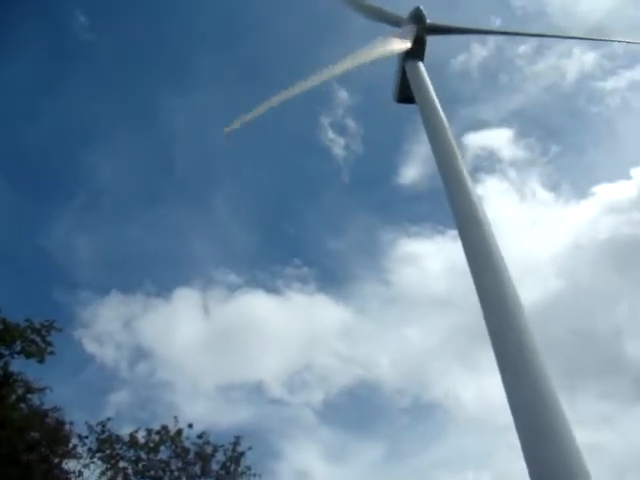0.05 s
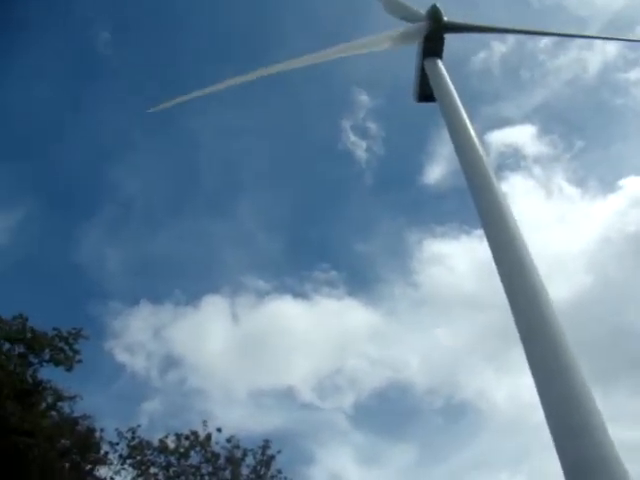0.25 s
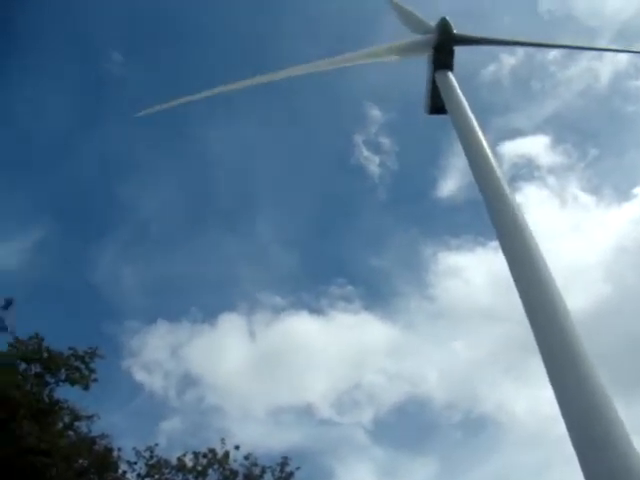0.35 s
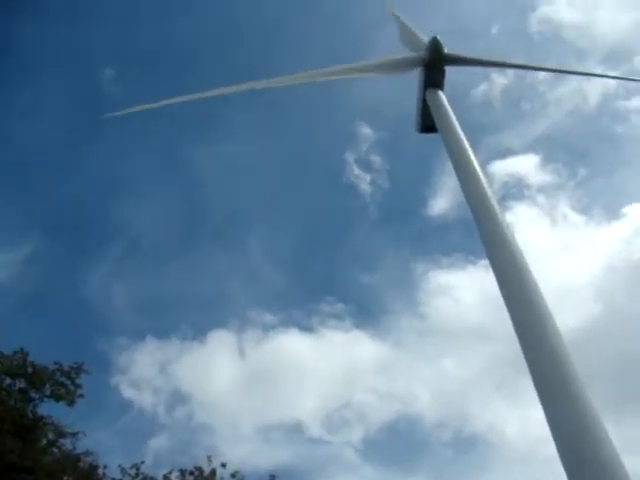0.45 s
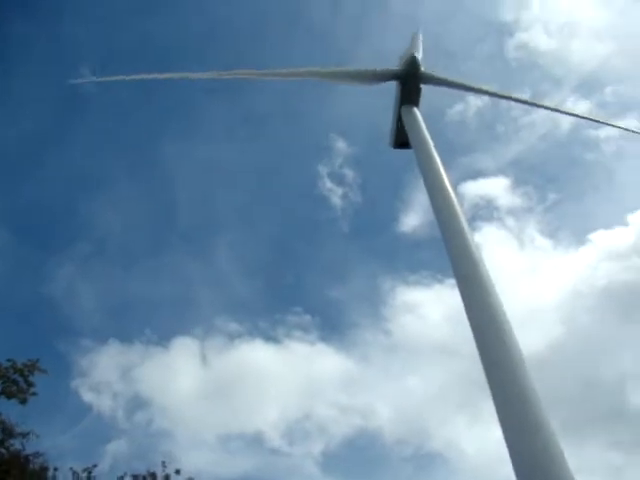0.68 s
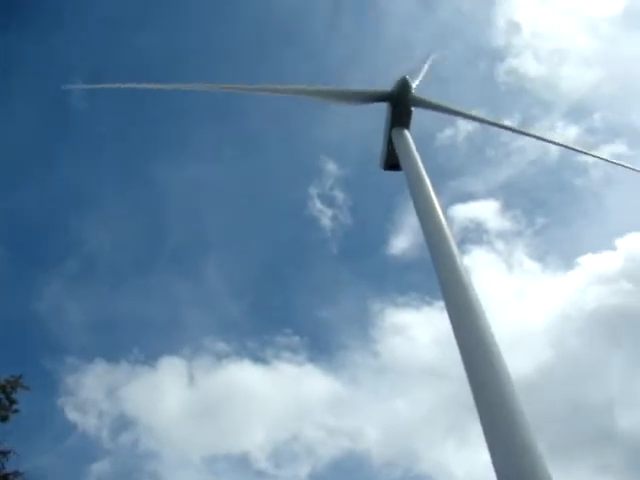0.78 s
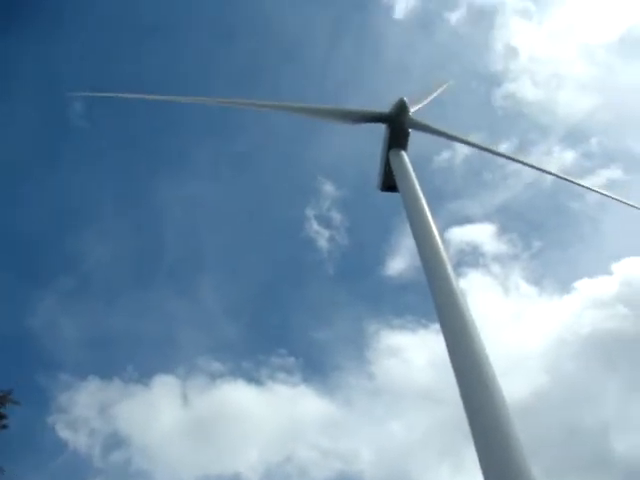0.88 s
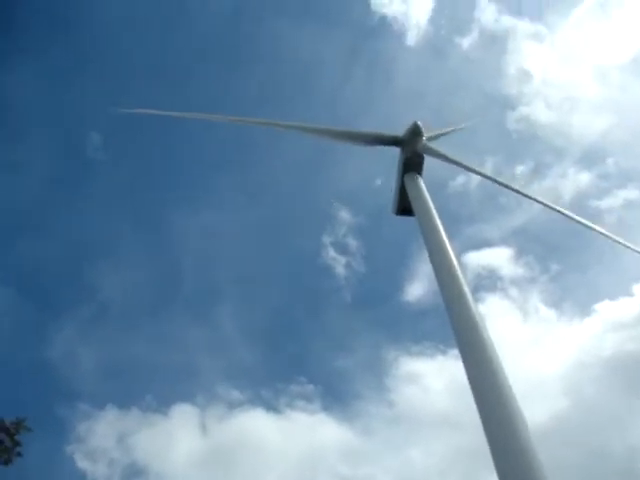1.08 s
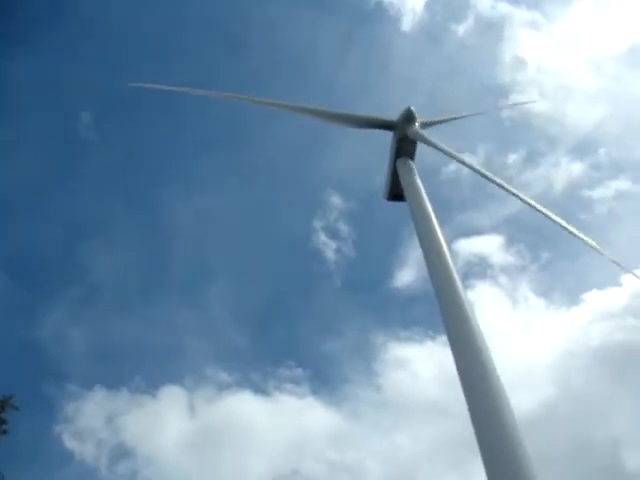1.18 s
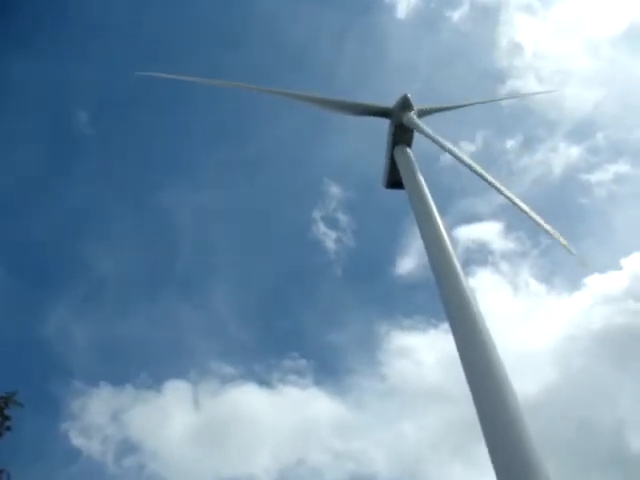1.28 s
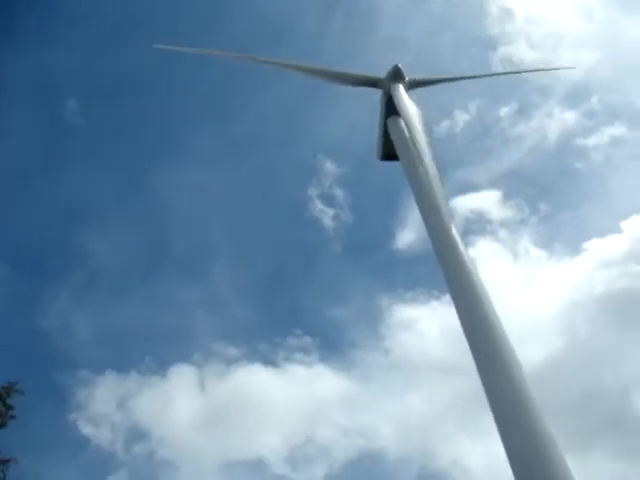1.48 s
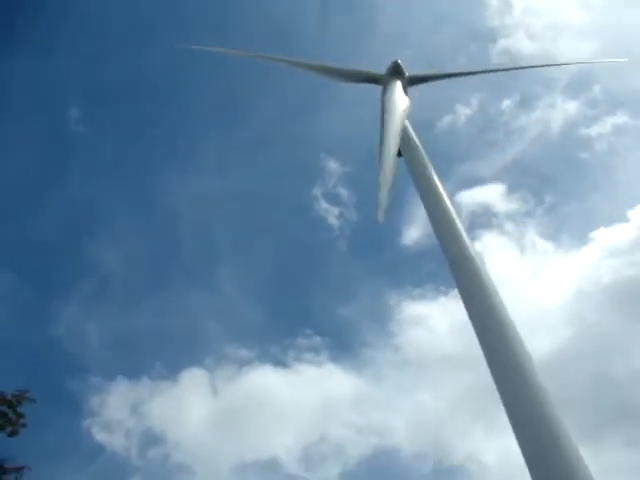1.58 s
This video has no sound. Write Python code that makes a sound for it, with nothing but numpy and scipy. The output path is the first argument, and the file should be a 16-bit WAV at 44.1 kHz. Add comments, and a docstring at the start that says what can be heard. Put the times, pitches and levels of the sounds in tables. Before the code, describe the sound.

Steady wind with a swelling turbine blade swish and close plastic handling knocks.

```python
"""Under a wind turbine

Steady wind and a faint gear hum. A blade sweeps down: its swish swells, its tip whistles thinly.
A hand-held camera is tilted: its plastic casing knocks, creaks and ticks right at the microphone."""
import sys
import numpy as np
from scipy import signal
from scipy.fft import rfft, irfft, next_fast_len
from scipy.io import wavfile
from scipy.ndimage import uniform_filter1d, map_coordinates

SR = 44100
rng = np.random.default_rng(int(sys.argv[2]) if len(sys.argv) > 2 else 0)


def wav_out(sig):
    """Save sig, one row per channel (or a flat mono array), as 16-bit PCM at SR to the path in sys.argv[1]."""
    wavfile.write(sys.argv[1], SR, np.round(np.clip(np.atleast_2d(sig).T, -1, 1) * 32767).astype(np.int16))


N = 72765

# wind in the open and in trees: f/Hz, relative density/dB
WIND_SPECTRUM = [(25, -23), (60, -21), (100, -6.5), (150, -10.5), (220, 1), (400, 1.5), (750, 0.5),
                 (1200, -1.5), (2000, -6.5), (3200, -8), (5000, -13.5), (6200, -19), (8000, -20),
                 (10000, -24.5)]
# air rushing off the blade: t/s, whoosh level/dB, swish level/dB
BLADE_SWEEP = [(0, -62, -60), (.4, -55, -63), (.72, -60.5, -48.5), (.92, -53.5, -46), (1.18, -47.5, -43.5),
               (1.4, -45, -44), (1.65, -45.5, -47)]
# low blade noise: f/Hz, relative density/dB
WHOOSH_SPECTRUM = [(80, -47), (170, -21.5), (350, -5), (700, 5.5), (1300, -2.5), (2200, -2.5), (5000, -30)]
# high blade noise: f/Hz, relative density/dB
SWISH_SPECTRUM = [(500, -19), (1100, 3.5), (1700, -4), (2800, 0), (4800, -1), (6000, -11), (8000, -17.5),
                  (10000, -21.5)]
# gearbox and generator: f/Hz, level/dB
GEAR_TONES = [(151, -65.5), (301, -63), (486, -59.5)]
# casing knocks: t/s, level/dB, f/Hz, swell/s, relative clatter/dB, relative snap/dB
CASING_KNOCKS = [ (0.046, -31.5, 1270, 0.0011, -8, -37), (0.1253, -29.5, 1163, 0.0025, -4, -39),
                 (0.1934, -32, 1300, 0.00093, -24, -35), (0.2238, -20.5, 1227, 0.0016, -2, -3.5),
                 (0.2276, -6, 1280, 0.0021, -8.5, -17), (0.237, -18.5, 1190, 0.00083, -26, -41),
                 (0.2444, -51, 1300, 0.00079, -32, -27), (0.302, -22.5, 1304, 0.0032, -22.5, -38.5),
                 (0.3154, -25.5, 1300, 0.0017, -13.5, -34), (0.3206, -27.5, 1320, 0.0028, -23, -30),
                 (0.373, -29, 1180, 0.0029, -25, -35), (0.4302, -22.5, 1320, 0.0004, -21.5, -35),
                 (0.4387, -21.5, 1310, 0.00043, -18.5, -7.5), (.4409, -17, 1282, 0.0028, -20, -29),
                 (0.4494, -30.5, 1290, 0.0024, -25, -31.5), (.4626, -19, 1200, 0.00027, -3, -17.5),
                 (0.4647, -18.5, 1275, 0.0016, -16.5, -34), (0.4918, -29.5, 1170, 0.0017, -25, -35),
                 (0.5176, -25.5, 1324, 0.0045, -14.5, -16), (0.5282, -31, 1308, 0.0035, -22, -27),
                 (0.534, -33.5, 1260, 0.003, -18, -32), (0.671, -23, 1110, 0.00044, -4.5, -35),
                 (0.6736, -18.5, 1240, 0.0017, -21, -44), (0.8157, -28, 1340, .0023, -27, -42),
                 (0.8288, -30.5, 1310, 0.0025, -34, -48), (1.1758, -31, 1440, 0.0011, -18, -29),
                 (1.2, -27.5, 1206, 0.002, -20, -33), (1.3085, -26.5, 1247, .0018, -15, -37),
                 (1.46, -31.5, 1380, 0.0011, -21, -24), (1.5607, -25, 1310, 0.00066, -14.5, -29),
                 (1.564, -27, 1200, 0.00074, -13.5, -35), (1.5745, -28, 1190, 0.0009, -24, -29),
                 (1.5944, -29, 1530, 0.001, -27, -35), (1.643, -28.5, 1170, 0.0033, -30, -35)]
# casing modes: f ratio, relative level/dB, swell ratio, dB per dB of clatter
CASING_MODES = [(.56, -17.5, 2.2, 0.7), (1, 1.5, 1, 0), (1.91, -4.5, 1.2, 1.2), (2.54, -23.5, .8, 0.3)]
# contact clatter: f/Hz, relative density/dB
CLATTER_SPECTRUM = [(200, -30.5), (450, -7.5), (700, 3), (1000, 2.5), (1500, -4.5), (1900, 2.5), (2200, -9),
                    (2500, -3.5), (2900, -7), (3600, -9), (4300, -27), (10000, -38.5)]
# bright contact snap: f/Hz, relative density/dB
SNAP_SPECTRUM = [(2000, -2.5), (3300, 2), (4200, -1.5), (5400, 1), (7200, -0.5), (8300, -11),
                 (10000, -10.5)]
# grip creaks: centre t/s, 1/e half-width/s, level/dB
GRIP_CREAKS = [(0.094, 0.014, -44), (0.284, 0.024, -39), (0.528, 0.018, -36), (0.695, 0.0087, -43.5),
               (1.038, 0.023, -40), (1.134, 0.015, -36.5), (1.173, 0.012, -38), (1.396, 0.011, -36),
               (1.585, 0.029, -39)]
# slips of a catch: t/s, pre-filter level/dB
CATCH_TICKS = [(1.047, -14), (1.0564, -14.5), (1.066, -39)]


def amp(db):
    """dB to gain."""
    return 10 ** (np.asarray(db) / 20)


def unit(x):
    """Scale to rms 1."""
    return x / np.sqrt(np.mean(x ** 2) + 1e-20)


def clock():
    """Sample times in s."""
    return np.arange(N) / SR


def wobble(rate_hz):
    """Smooth curve through random knots."""
    knots = rng.standard_normal(int(N * rate_hz / SR) + 4)
    return map_coordinates(knots, [np.arange(N) * rate_hz / SR])


def filtered(x, response):
    """Apply a frequency response."""
    size = next_fast_len(N + SR // 2)
    return irfft(rfft(x, size) * response(np.fft.rfftfreq(size, 1 / SR)), size)[..., :N]


def rush(spectrum, patchy_db):
    """Shaped noise, rms 1, with random gain patches in time and frequency."""
    bins = signal.stft(rng.standard_normal(N), nperseg=512)[2]
    patches = uniform_filter1d(rng.standard_normal(bins.shape), size=6, axis=0)
    patches = uniform_filter1d(patches, size=12, axis=1)
    noise = signal.istft(bins * amp(patchy_db * unit(patches)), nperseg=512)[1][:N]
    knots_hz, db = np.transpose(spectrum)
    return unit(filtered(noise, lambda hz: amp(np.interp(np.log(hz + 1), np.log(knots_hz), db))))


def resonate(x, centre_hz, width_hz):
    """Two equal band-pass resonances in series; output rms 1."""
    def response(hz):
        loss = 1j * hz * width_hz
        return (loss / (centre_hz ** 2 - hz ** 2 + loss)) ** 2
    return unit(filtered(x, response))


def ring(age_s, hz, swell_s, damping_power=1.27):
    """Vibration peaking at swell_s; the hand chokes it faster than a free decay."""
    u = age_s / swell_s
    envelope = u * np.exp((1 - u ** damping_power) / damping_power)
    return envelope * np.sin(2 * np.pi * hz * age_s)


def wind(level_db=-43):
    """Even rush of air with slight gusts."""
    gusts_db = 0.9 * wobble(rate_hz=2.2) + 0.24 * wobble(rate_hz=25)
    return amp(level_db + gusts_db) * rush(WIND_SPECTRUM, patchy_db=1.1)


def blade(flutter_db=0.5, flutter_hz=14):
    """Air off the descending blade: a hiss first, then a lower whoosh."""
    times_s, whoosh_db, swish_db = np.transpose(BLADE_SWEEP)

    def band(levels_db, spectrum, patchy_db):
        db = np.interp(clock(), times_s, levels_db) + flutter_db * wobble(flutter_hz)
        return amp(db) * rush(spectrum, patchy_db)

    whoosh = band(whoosh_db, WHOOSH_SPECTRUM, patchy_db=2.5)
    swish = band(swish_db, SWISH_SPECTRUM, patchy_db=0.5)
    return whoosh + swish


def tip_whistle(level_db=-60.5, peak_s=1.0, half_width_s=0.56):
    """The blade tip whistles: narrow-band noise swells and fades."""
    swell = amp(level_db) * np.exp(-((clock() - peak_s) / half_width_s) ** 2)
    return swell * resonate(rng.standard_normal(N), centre_hz=6850, width_hz=390)


def gear_hum(wander_rad=0.17):
    """Slightly unsteady tones from the nacelle."""
    hum = np.zeros(N)
    for hz, db in GEAR_TONES:
        phase = 2 * np.pi * hz * clock() + wander_rad * wobble(rate_hz=7.5)
        hum += amp(db) * np.sqrt(2) * np.sin(phase)
    return hum


def knocks(rise_s=0.00065, clatter_t60_s=0.019, snap_t60_s=0.018):
    """Knocks ring the casing; hard ones wake its overtones and start with clatter and snap."""
    rings, clatter_env, snap_env = np.zeros((3, N + SR))
    age_s = np.arange(SR // 20) / SR
    rise = 1 - np.exp(-age_s / rise_s)
    for at_s, db, hz, swell_s, clatter_db, snap_db in CASING_KNOCKS:
        start = round(at_s * SR)
        span = slice(start, start + len(age_s))
        for f_ratio, mode_db, swell_ratio, coupling in CASING_MODES:
            gain = amp(db + mode_db + coupling * clatter_db)
            rings[span] += gain * ring(age_s, hz * f_ratio, swell_s * swell_ratio)
        clatter_env[span] += rise * amp(db + clatter_db - 60 * age_s / clatter_t60_s)
        snap_env[span] += rise * amp(db + snap_db - 60 * age_s / snap_t60_s)
    clatter = clatter_env[:N] * rush(CLATTER_SPECTRUM, patchy_db=0)
    snap = snap_env[:N] * rush(SNAP_SPECTRUM, patchy_db=1)
    return rings[:N] + clatter + snap


def creaks(slips_per_s=1500):
    """Dense tiny slips of the grip excite the casing."""
    slips = rng.standard_normal(N) * (rng.random(N) < slips_per_s / SR)
    envelope = sum(amp(db) * np.exp(-((clock() - at_s) / half_width_s) ** 2)
                   for at_s, half_width_s, db in GRIP_CREAKS)
    return envelope * resonate(slips, centre_hz=1260, width_hz=760)


def ticks(cutoff_hz=2960):
    """A catch slips three times, muffled, barely ringing."""
    slips = sum(amp(db) * ring(np.maximum(clock() - at_s, 0), hz=2260, swell_s=0.00021)
                for at_s, db in CATCH_TICKS)
    return signal.sosfilt(signal.butter(6, cutoff_hz, fs=SR, output="sos"), slips)


def casing_radiation(vibration, cutoff_hz=400):
    """The small casing radiates little bass."""
    return signal.sosfilt(signal.butter(2, cutoff_hz, "highpass", fs=SR, output="sos"), vibration)


def scene():
    """Wind and turbine far off, handling noise close by; mono."""
    far = wind() + blade() + tip_whistle() + gear_hum()
    near = casing_radiation(knocks() + creaks() + ticks())
    return (far + near)[None]


def record(dry, top_hz=10100):
    """The camera passes nothing above its band limit."""
    return filtered(dry, lambda hz: hz < top_hz)


dry = scene()
out = record(dry)
wav_out(out)
```